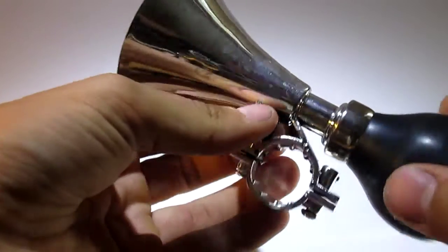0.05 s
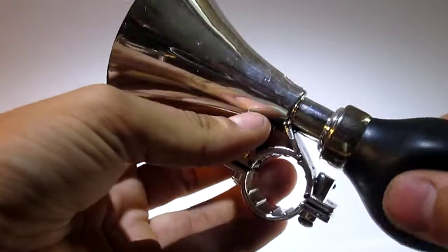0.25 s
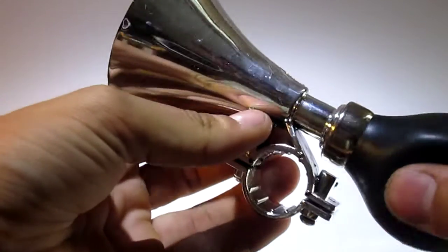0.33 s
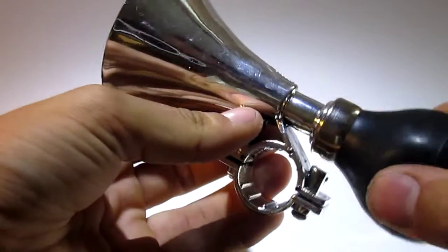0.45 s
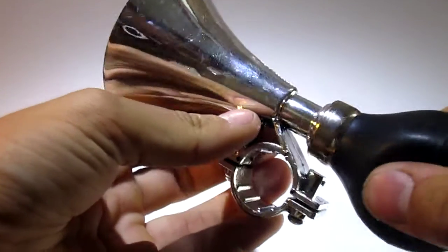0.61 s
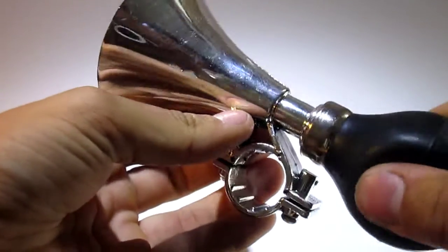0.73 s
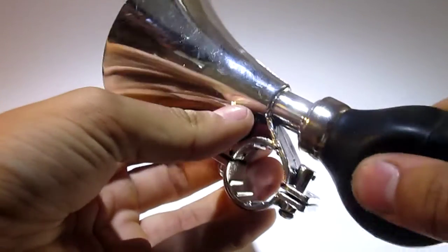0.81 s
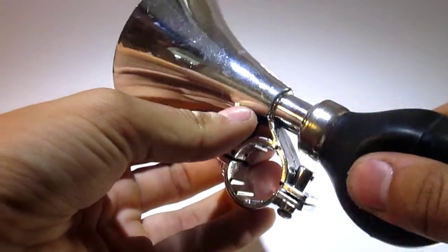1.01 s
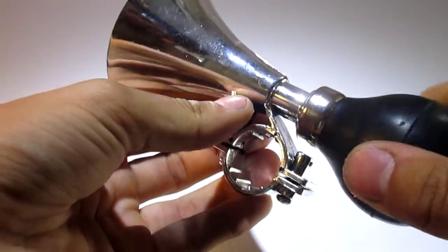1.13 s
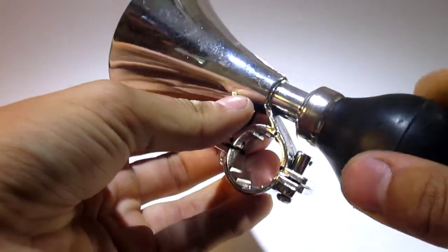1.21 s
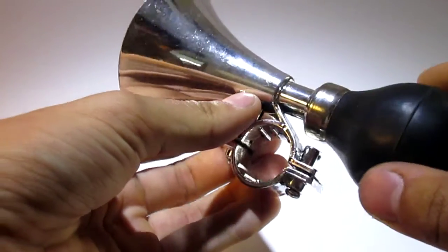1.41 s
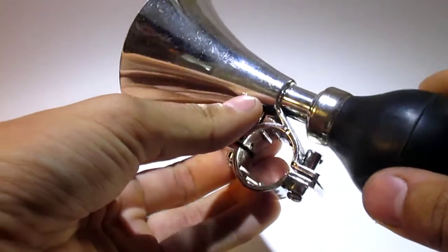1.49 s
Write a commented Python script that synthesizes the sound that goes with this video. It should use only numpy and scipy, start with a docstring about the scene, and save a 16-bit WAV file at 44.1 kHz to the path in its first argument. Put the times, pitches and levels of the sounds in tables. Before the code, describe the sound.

A small bicycle bulb horn honks in four quick double toots, close up.

```python
"""A quiet room, a close stereo pair, a small metal bicycle horn straight ahead and nearly mono.
A hand pumps the rubber bulb four times. The reed honks on each squeeze and again as the bulb refills;
its pitch arches with the air pressure and it turns a little hoarse just before it stalls.
The first honk starts with a pop. The room rings briefly over a faint rustle and microphone hiss,
and a limiter holds the peaks."""
import sys
import numpy as np
from scipy import signal
from scipy.fft import rfft, irfft
from scipy.io import wavfile
from scipy.ndimage import uniform_filter1d

SR = 44100
rng = np.random.default_rng(int(sys.argv[2]) if len(sys.argv) > 2 else 0)


def store_wav(level_fs):
    """Save 16-bit WAV to argv[1]."""
    pcm = np.round(np.clip(np.atleast_2d(level_fs), -1, 1) * 32767)
    wavfile.write(sys.argv[1], SR, pcm.T.astype(np.int16))


N = 68355
TIME = np.arange(N) / SR
FREQS = np.fft.rfftfreq(N, 1 / SR)


def horn():
    """The bulb blows air out through the reed and sucks it back, each direction with its own colour."""
    # reed pitch, one list per stroke: t/s, f/Hz
    squeeze_pitch = [
        [(0.2415, 869), (0.2494, 928), (0.2573, 941.6), (0.2691, 951.3), (0.3085, 921.8), (0.3242, 929),
         (0.3321, 886), (0.3361, 880), (0.34, 847)],
        [(0.4805, 873), (0.4885, 930.5), (0.5044, 961), (0.5123, 975.5), (0.5243, 973.3), (0.5362, 977),
         (0.5521, 944), (0.572, 892.7), (0.58, 843)],
        [(0.7135, 882), (0.731, 967), (0.745, 976), (0.7555, 969), (0.7695, 951), (0.78, 943), (0.794, 873),
         (0.801, 840)],
        [(0.9215, 909), (0.9384, 969.2), (0.9553, 963.5), (0.9654, 962.7), (0.979, 937), (0.9959, 883),
         (0.9992, 892), (1.006, 841)],
    ]
    refill_pitch = [
        [(0.3705, 868), (0.3765, 883), (0.3886, 915), (0.3977, 934), (0.4249, 954.8), (0.4339, 878),
         (0.44, 895), (0.446, 802)],
        [(0.6115, 875), (0.6296, 934), (0.6508, 940), (0.6568, 953.4), (0.6689, 917), (0.6749, 890),
         (0.6779, 905), (0.687, 823)],
        [(0.831, 880.5), (0.8476, 917.4), (0.8558, 947), (0.8614, 967), (0.8724, 984), (0.8807, 971),
         (0.889, 910), (0.9, 841)],
        [(1.036, 889.5), (1.0475, 895), (1.0504, 921), (1.085, 1000), (1.0878, 1062), (1.0936, 989),
         (1.0965, 930), (1.1022, 897), (1.108, 805)],
    ]
    # force, one row per stroke: level/dB, brightness/(dB per octave)
    squeeze_force = [(1.4, -0.9), (0.4, -0.63), (0, -0.35), (2.2, -.3)]
    refill_force = [(0.301, 0.22), (0.601, -.2), (.7, -0.3), (.8, -0.61)]
    # colour of the horn as heard, bell resonances plus notches from nearby reflections:
    # f/Hz, squeeze level/dB, refill level/dB
    horn_colour = [(826, -38, -36.5), (928, -34, -35), (1620, -20, -15), (1906, -11.5, -10.5),
                   (1966, -15.5, -12.5), (2210, -22, -26), (2694, -16.5, -14.5), (2740, -22.5, -23),
                   (3038, -12.5, -16), (3660, -31, -33.5), (3647, -19.5, -19.5), (3846, -17.5, -25),
                   (3917, -38, -23.5), (4504, -25.5, -31.5), (5270, -38.5, -43.5), (5600, -33.5, -40.5),
                   (6540, -44, -49), (6390, -39, -35), (7400, -43.5, -51.5), (8240, -47, -40.5),
                   (8660, -43, -52.5), (10400, -48, -50.5), (12800, -67, -70), (14370, -65, -78.5),
                   (16000, -79.5, -96.5)]
    blown = [(hz, db) for hz, db, _ in horn_colour]
    sucked = [(hz, db) for hz, _, db in horn_colour]
    squeezes = sum(honk(stroke, blown, *force) for stroke, force in zip(squeeze_pitch, squeeze_force))
    refills = sum(honk(stroke, sucked, *force) for stroke, force in zip(refill_pitch, refill_force))
    return squeezes + refills


def honk(stroke, colour, level_db, bright_db):
    """One stroke: air rushes and the reed's harmonics glide through the colour's peaks and notches."""
    # air rushing through the reed: f/Hz, relative level/dB
    air_colour = [(30, 1), (90, 0.5), (200, -7.5), (380, -19.5), (700, -6.5), (1200, -6.5), (1800, -18.5),
                  (3500, -35), (5500, -27), (10000, -25), (15000, -49)]
    attack_s, stall_s, release_s, ring_on_s = 0.0035, 0.014, 0.025, 0.011
    sag_hz_per_s, wander_db_per_octave = 8000, 1.46
    times, hz = np.transpose(stroke)
    on = (TIME > times[0] - attack_s / 2) & (TIME < times[-1] + ring_on_s)
    age = TIME[on] - times[0] + attack_s / 2
    remaining = times[-1] - TIME[on]
    hoarse = ramp(2 - remaining / stall_s) ** 2
    fade = ramp((remaining + ring_on_s) / release_s)   # the pressure runs out
    scoop = 1 - 0.21 * np.exp(-age / 0.0018)   # each honk starts flat
    pitch = np.interp(TIME[on], times, hz) * scoop + sag_hz_per_s * np.minimum(remaining, 0)
    jitter = 1 + (0.0009 + 0.005 * hoarse) * waver(hz=350)[on]
    phase = 2 * np.pi * np.cumsum(pitch * jitter) / SR
    tone = 0
    for k in range(1, 18):
        octaves = np.log2(max(k / 2, 1))   # above the second harmonic
        flutter = 1 + (0.01 + 0.13 * hoarse) * waver(hz=140)[on]
        build = ramp(age / (attack_s + 0.0006 * max(k - 2, 0)))   # upper partials build later
        dulling = fade ** (0.13 * octaves)   # and fade sooner
        tilt_db = octaves * (bright_db + wander_db_per_octave * waver(hz=32.4)[on])
        strength = from_db(settle(at_hz(colour, k * pitch)) + level_db + tilt_db)
        dispersion = 0.4695 * k * k   # the bell delays higher partials
        tone += strength * build * dulling * flutter * np.cos(k * phase - dispersion)
    air = from_db(-50.5 + hoarse) * ramp(age / attack_s) * noise(air_colour)[on]
    out = np.zeros(N)
    out[on] = fade * (tone + air)
    return out


def settle(db, smooth_s=0.003):
    """A gliding partial's level takes a few cycles to follow the peaks and notches."""
    size = int(smooth_s * SR)
    return uniform_filter1d(uniform_filter1d(db, size), size)


def pop(start_s=0.2419, rise_s=0.00077, thump_hz=185):
    """The first puff of air thumps and rings the bell for a few cycles."""
    # ringing modes: f/Hz, level/dB, T60/s
    modes = [(661, -15.5, 0.015), (1405, -7, .012), (2500, -4, .006)]
    age = np.maximum(TIME - start_s, 0)
    ring = sum(from_db(db - 60 * age / t60) * np.sin(2 * np.pi * hz * age) for hz, db, t60 in modes)
    turn = 2 * np.pi * thump_hz * age
    thump = from_db(-28.5) * turn * np.exp(1 - turn)
    return ring * ramp(age / rise_s) - thump


def puffs(half_length_s=0.0057):
    """The rubber bulb bottoms out with a soft thump as each stroke runs out."""
    # one soft puff per stroke: t/s, level/dB
    bursts = [(0.32, -52), (0.432, -36), (0.564, -40), (0.67, -44), (0.783, -42.5), (0.888, -37),
              (0.985, -37.5), (1.096, -34)]
    # spectrum of the puffs: f/Hz, relative level/dB
    colour = [(30, -5), (110, -5), (320, -8), (480, -24), (750, -4), (1200, -16), (3000, -13), (8000, -29),
              (15000, -37.5)]
    level = sum(from_db(db) * np.exp(-((TIME - s) / half_length_s) ** 2) for s, db in bursts)
    return level * noise(colour)


def fingers(rise_s=0.0027, decay_s=0.012):
    """Small ticks as the grip tightens on the rubber."""
    ticks = [(0.131, -51), (0.213, -52), (0.23, -36)]   # t/s, level/dB
    # spectrum of the ticks: f/Hz, relative level/dB
    colour = [(100, -14.5), (500, -13.5), (1400, -3), (4000, -13), (7000, -22), (15000, -31)]
    level = sum(from_db(db) * ramp((TIME - s) / rise_s) * np.exp(-np.abs(TIME - s) / decay_s)
                for s, db in ticks)
    return level * noise(colour)


def room(direct, delay_s=0.0029, build_s=0.024):
    """The room returns a diffuse tail in which each band dies at its own rate."""
    # reverberation against the direct sound: f/Hz, level/dB
    colour = [(150, -49.5), (450, -26), (950, -7), (1250, -20.5), (1600, -15.5), (1900, -17.5), (2100, -11),
              (2900, -14), (4800, -9), (5900, -11.5), (6900, -19.5), (8500, -13.5), (14000, -18.5)]
    # reverberation time: f/Hz, T60/s
    t60 = [(700, 0.51), (1850, 0.46), (4900, 0.45), (12000, .28)]
    spectrum = rfft(rng.standard_normal(N)) * from_db(at_hz(colour, FREQS))
    build = ramp((TIME - delay_s) / build_s)
    edges_hz = np.geomspace(100, 18000, 14)
    tail = 0
    for low, high in zip(edges_hz, edges_hz[1:]):
        decay = build * from_db(-60 * TIME / at_hz(t60, np.sqrt(low * high)))
        band = irfft(spectrum * ((FREQS >= low) & (FREQS < high)), N)
        tail += band * decay / np.sqrt(np.sum(decay ** 2))
    return signal.fftconvolve(direct, tail)[:N]


def rustle():
    """A faint, low rustle, a little stronger before the first honk and at the very end."""
    # course of the rustle: t/s, level/dB
    levels = [(0, -57.5), (.1, -55), (.22, -54.5), (.3, -62), (1.27, -65), (1.42, -63.5), (1.5, -62.5),
              (1.55, -56)]
    # its spectrum: f/Hz, relative level/dB
    colour = [(20, 10), (60, -0.5), (250, -6), (700, -11.5), (1500, -15), (3000, -20.5), (5000, -21.5),
              (15000, -46.5)]
    return from_db(np.interp(TIME, *np.transpose(levels))) * noise(colour)


def microphone_hiss():
    """Each microphone adds its own steady hiss."""
    # self-noise: f/Hz, relative level/dB
    colour = [(30, -15), (300, -13.5), (2000, -1.5), (15000, -1.5)]
    return from_db(-64.5) * np.array([noise(colour), noise(colour)])


def from_db(db):
    """Decibels to gain."""
    return 10 ** (np.asarray(db) / 20)


def rms_one(x):
    """Scale to unit power."""
    return x / np.sqrt(np.mean(x ** 2) + 1e-20)


def at_hz(points, hz):
    """Read a two-column table on a log-frequency axis."""
    freqs, values = np.transpose(points)
    return np.interp(np.log(np.maximum(hz, 1)), np.log(freqs), values)


def noise(colour):
    """Unit-power noise with the given colour."""
    return rms_one(irfft(rfft(rng.standard_normal(N)) * from_db(at_hz(colour, FREQS)), N))


def waver(hz):
    """Unit-power random wavering up to the given speed."""
    return rms_one(signal.sosfilt(signal.butter(2, hz, fs=SR, output="sos"), rng.standard_normal(N)))


def ramp(x):
    """Smooth step from 0 to 1."""
    return np.sin(np.pi / 2 * np.clip(x, 0, 1)) ** 2


def scene():
    """The horn close and centred between the microphones, with a narrow room sound around it."""
    # side signal of the pair against the mid: f/Hz, level/dB
    width = [(100, -44.5), (1000, -51), (2000, -29), (4000, -23.5), (8000, -17.5), (15000, -11.5)]
    close = horn() + pop() + puffs() + fingers()
    mid = close + rustle() + room(close)
    side = irfft(1j * rfft(mid) * from_db(at_hz(width, FREQS)), N)   # a quarter cycle from the mid
    side += from_db(-38) * room(close)
    return np.array([mid + side, mid - side]) + microphone_hiss()


def record(dry):
    """A limiter holds the honks level and recovers slowly; the top is cut steeply."""
    limit_db, attack_s, recover_db_per_s, cutoff_hz = -6.5, 0.00062, 28.5, 15900
    peak_db = 20 * np.log10(np.abs(dry).max(axis=0) + 1e-9)
    over_db = np.maximum(peak_db - limit_db, 0)
    recovery_db = recover_db_per_s * TIME
    held_db = np.maximum.accumulate(over_db + recovery_db) - recovery_db
    pole = np.exp(-1 / (attack_s * SR))
    limited = dry * from_db(-signal.lfilter([1 - pole], [1, -pole], held_db))
    return signal.sosfilt(signal.ellip(10, 0.1, 80, cutoff_hz, fs=SR, output="sos"), limited)


dry = scene()
out = record(dry)
store_wav(out)
```